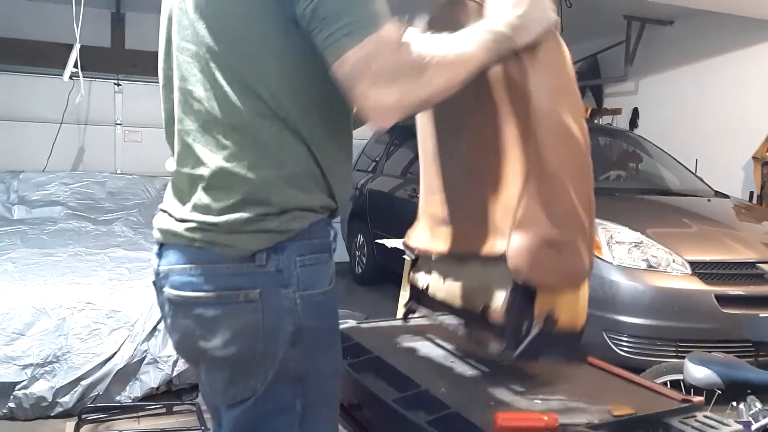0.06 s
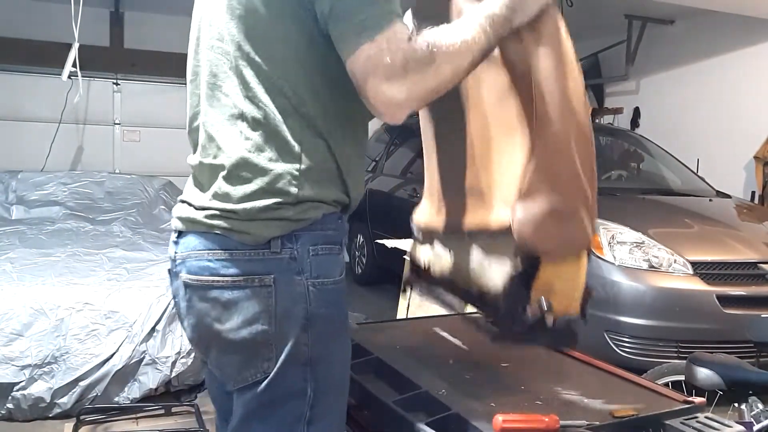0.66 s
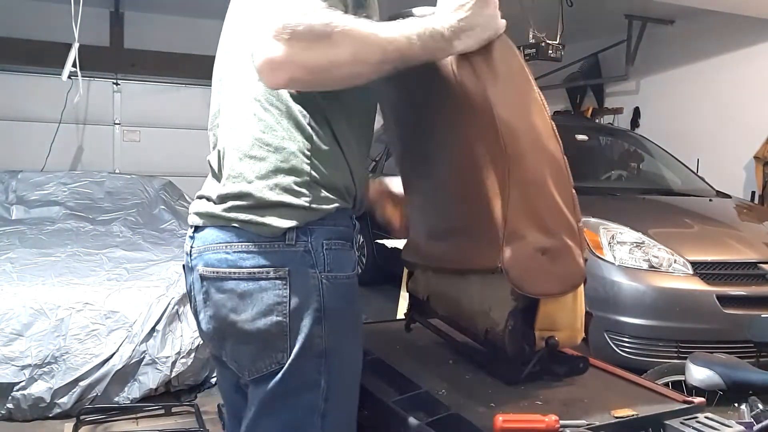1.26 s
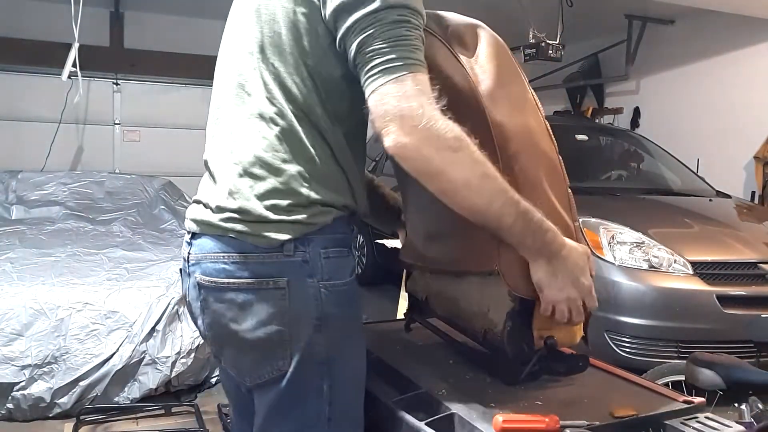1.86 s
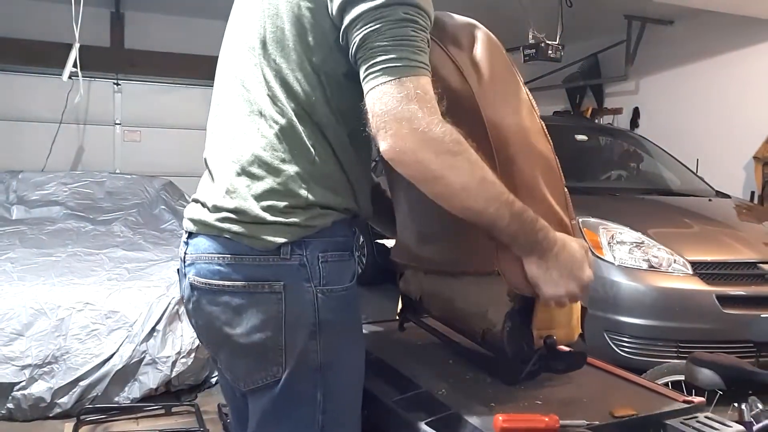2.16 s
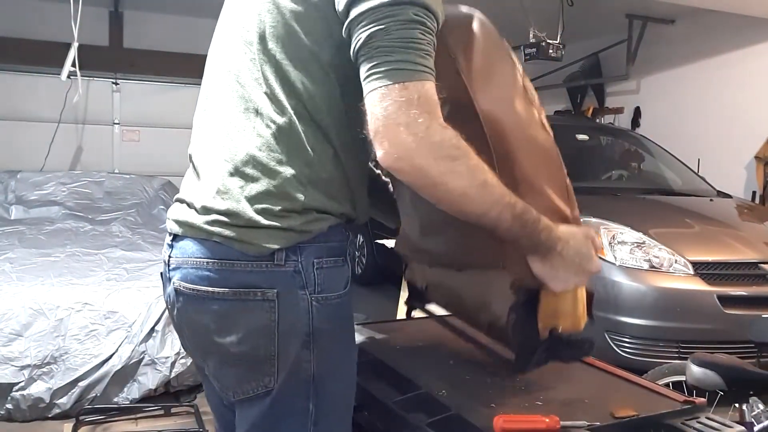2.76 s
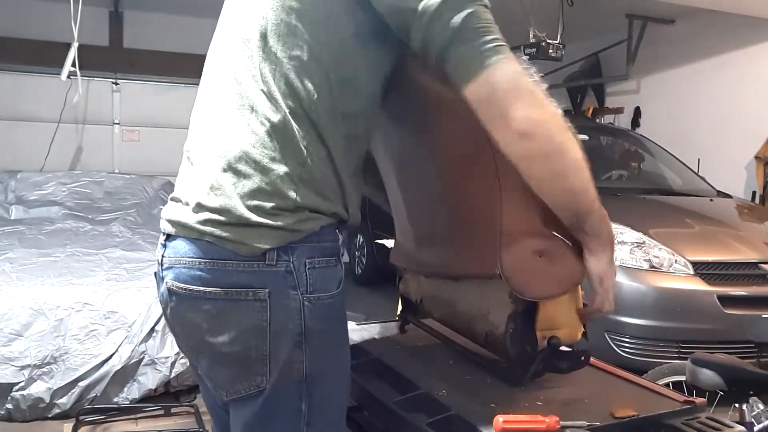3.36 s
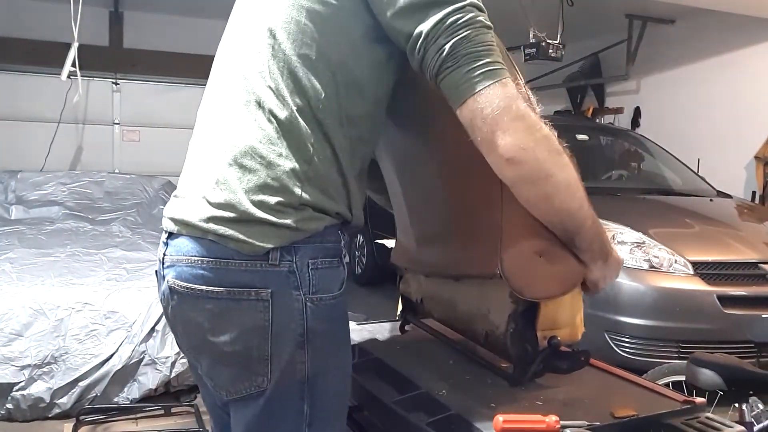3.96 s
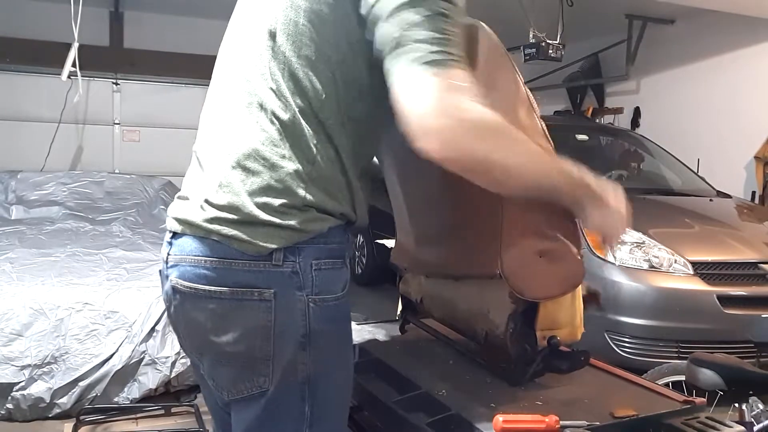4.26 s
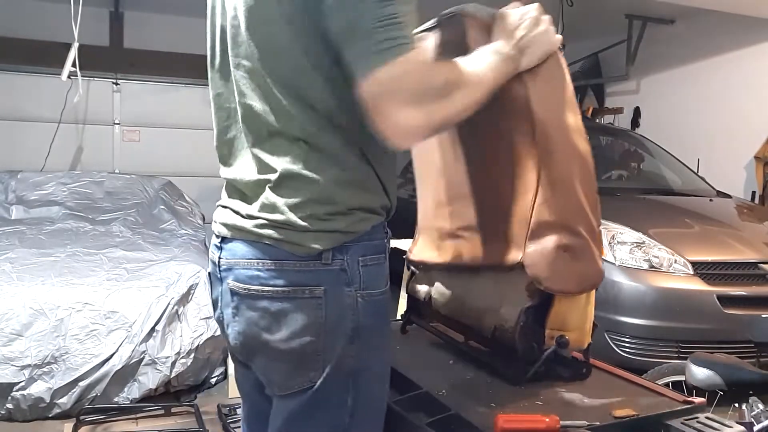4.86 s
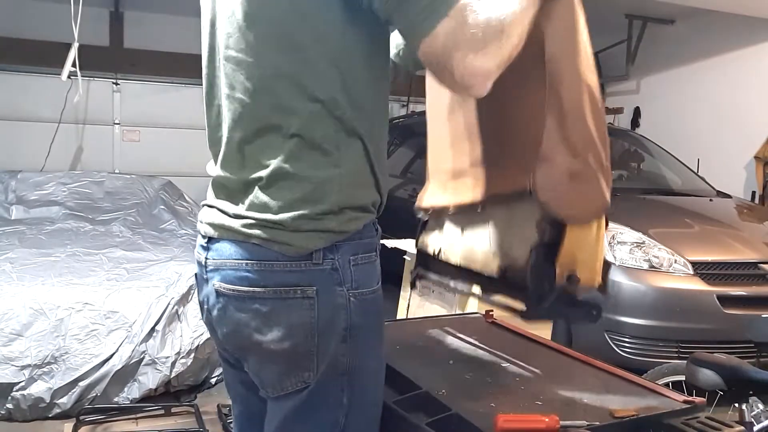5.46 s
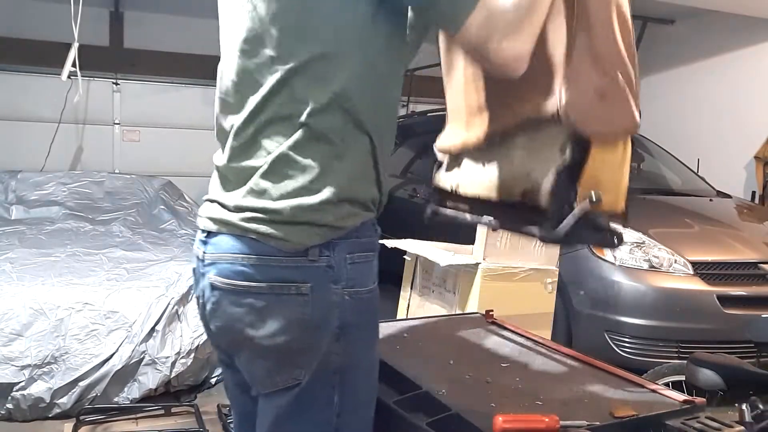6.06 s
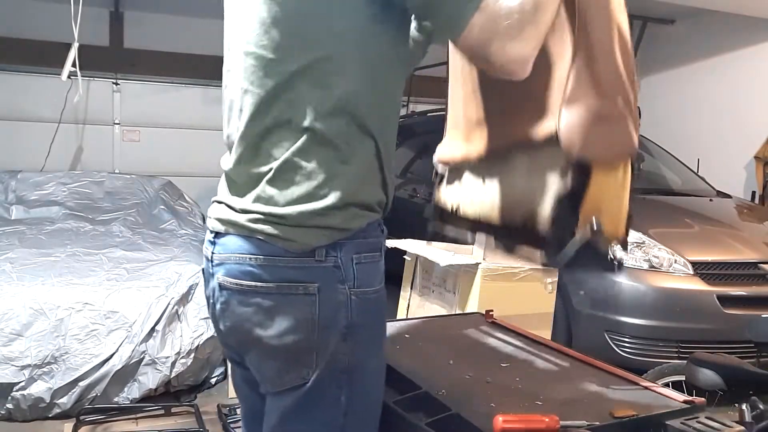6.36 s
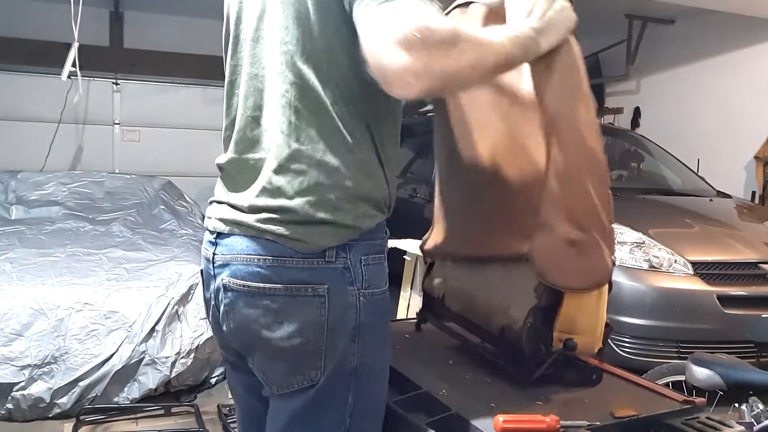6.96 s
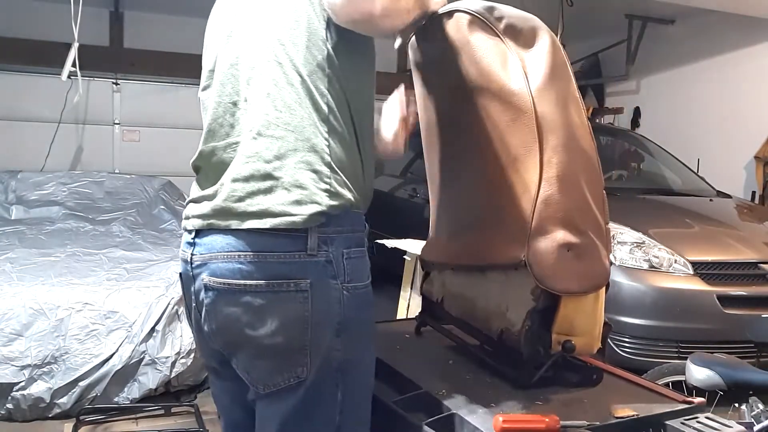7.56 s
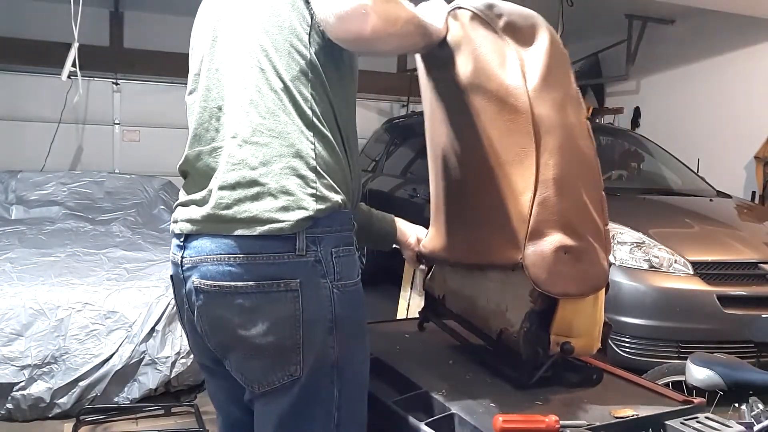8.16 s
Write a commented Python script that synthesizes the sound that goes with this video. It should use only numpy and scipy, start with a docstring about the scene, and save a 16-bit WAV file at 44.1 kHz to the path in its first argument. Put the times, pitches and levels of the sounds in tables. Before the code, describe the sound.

A car seat's steel frame knocks on a garage workbench while its cover is rubbed, tugged with a crackle and shaken so it flaps.

```python
"""A faint fading hiss comes first, then a rub and a bump: a loose cover is tugged over a car seat back.
The seat's steel frame knocks, rings and rocks on a garage workbench, and the bench top booms.
Small fittings click, hands hiss over the cloth, and the tight hem rips free with a crackle.
The feet scrape as the seat is lifted; it is shaken so the slack cover flaps, then set down again.
The garage adds a short echo and a faint hush of air."""
import sys
import numpy as np
from scipy import signal
from scipy.fft import rfft, irfft
from scipy.io import wavfile

SR = 44100
rng = np.random.default_rng(int(sys.argv[2]) if len(sys.argv) > 2 else 0)


def output_pcm(signal):
    """Save a mono or channel-first signal as 16-bit PCM at the path in sys.argv[1].

    Samples are clipped to [-1, 1] before scaling.
    """
    pcm = np.clip(np.atleast_2d(signal).T, -1, 1) * 32767
    wavfile.write(sys.argv[1], SR, np.round(pcm).astype(np.int16))


N = 361619
TIME = np.arange(N) / SR
ONE_SECOND = TIME[:SR]

# The frame hits the bench: (time [s], frame level [dB], thud level [dB], clack level [dB],
# frame brightness [dB])
KNOCKS = [(0.403, -27, -42, -42.5, -3.5), (0.769, -22.5, -46, -36.5, 1), (0.774, -20.5, -26.5, -28.5, -3.5),
          (0.891, -27, -33, -43, -1.5), (0.915, -31.5, -42, -43, -1.5), (0.968, -29.5, -36, -38, -1.5),
          (2.825, -24.5, -28.5, -40.5, -4.5), (4.823, -40.5, -49.5, -61.5, -1.5), (5.076, -57, -73, -53, 4),
          (6.893, -25, -37, -32, 4.5), (7.003, -31.5, -35.5, -42, 2), (8.19, -49, -54, -74.5, -1)]
# Fittings snap: (time [s], level [dB], extra treble [dB])
CLICKS = [(0.806, -26.5, -12.5), (0.916, -39.5, -3), (1.026, -45, 0), (1.982, -52, -22), (2.152, -53, 2.5),
          (2.304, -39, 1.5), (6.922, -30, -5.5), (7.048, -56.5, 15)]
# Single flaps of the slack cover, from a tug or in mid-shake: (time [s], level [dB], starting pitch [Hz])
SINGLE_FLAPS = [(0.086, -56, 250), (2.017, -50.5, 188), (2.307, -35, 171.5), (3.302, -59.5, 177),
                (5.655, -45, 339.4)]
# Turns of the shaking, bottom then top: (time [s], flap level [dB], slide level [dB],
# hem delay [s], hem level [dB])
SHAKES = [(5.354, -40.5, -49, .04, -43), (5.552, -40, -56.5, .034, -44), (5.756, -31.5, -51, .04, -33.5),
          (5.936, -35.5, -56.5, .02, -41), (6.154, -31.5, -48, .04, -55), (6.321, -39.5, -57, .04, -38),
          (6.545, -43, -56, .048, -48.5)]
# The cover slides early and fast at the bottom, late and slow at the top: (delay [s], rise [s], fall [s])
SLIDE_DOWN, SLIDE_UP = (0.012, 0.021, 0.058), (0.071, 0.047, 0.086)
# A faint fading hiss opens the scene; in the later rows the cover is pulled over the foam:
# (loudest time [s], rise [s], fall [s], level [dB])
SWISHES = [(0.03, 0.078, .025, -66), (0.096, 0.013, 0.05, -44), (0.265, 0.021, 0.041, -54.5),
           (0.388, 0.018, 0.018, -51), (0.585, 0.034, 0.039, -55), (0.715, 0.037, 0.04, -55.5),
           (1.0, 0.075, 0.08, -49.5), (1.325, 0.085, 0.076, -59), (1.657, 0.019, 0.13, -61.5),
           (2.1, 0.066, 0.092, -60.5), (2.34, 0.12, 0.065, -58.5), (3.61, 0.018, 0.058, -62.5),
           (4.95, 0.16, 0.073, -59.5), (5.246, 0.047, 0.086, -54.5), (7.5, 0.27, 0.17, -58),
           (8.099, 0.02, 0.054, -56.5)]
# A hand or sleeve brushes by: (time of top speed [s], rise [s], fall [s], level [dB], low edge [Hz])
BRUSHES = [(1.84, .12, 0.19, -58.5, 1500), (3.13, 0.12, 0.067, -74.5, 2000),
           (3.395, .028, 0.064, -58, 4720), (3.945, 0.013, 0.029, -67.5, 3500),
           (4.15, 0.019, 0.038, -62.5, 3790), (4.275, 0.048, 0.058, -56, 2990),
           (4.494, 0.014, 0.083, -55.5, 2180), (4.76, 0.033, 0.3, -66, 1500), (7.27, 0.11, 0.15, -56, 1500),
           (7.85, 0.1, 0.45, -67, 3970)]

# The tones each part rings with: (pitch [Hz], level [dB], time to fade by 60 dB [s])
FRAME_TONES = [(273, 3.5, 0.17), (310.5, 4, 0.15), (361, -4, 0.15), (437, -8.5, .24), (515, -9, .15),
               (623.4, -3, 0.17), (692.6, -10, .22), (785, -15, 0.14), (1288, -18.5, 0.27),
               (1404, -20, 0.19), (2480, -23, .22)]
BENCH_TONES = [(80.4, -4, 0.19), (97, -1, 0.15), (124.1, 4, 0.098), (171, 1.5, 0.11)]
FITTING_TONES = [(4400, -1, .13), (5215, 2, 0.073), (6550, 9, .07)]

# How strong each noise is from bass to treble: (frequency [Hz], level [dB])
FRAME_CLUNK = [(45, -39), (150, -2.5), (230, -7.5), (320, 3), (480, -2.5), (700, -3), (1000, -11),
               (2000, -22.5), (12000, -63)]
STEEL_CLACK = [(200, -24.5), (700, -7), (1500, 5.5), (2500, 2), (3600, -0.5), (5500, -5.5), (6700, -2),
               (7800, -17), (11000, -20), (16000, -26.5)]
FITTING_SNAP = [(400, -22), (2000, -3.5), (4500, -5.5), (6700, 0.5), (7900, -6), (10000, -0.5),
                (16000, -13.5)]
FOAM_THUMP = [(60, -22), (150, 11), (235, -8), (345, 3.5), (500, -13.5), (4000, -43.5)]
CLOTH_HISS = [(100, -25), (600, -6), (2200, -8), (4000, -4), (6600, -2), (7300, -4.5), (7900, -12.5),
              (11000, -10), (16000, -18.5)]
COVER_RASP = [(50, -18.5), (150, 9.5), (220, 6), (800, 4), (1500, 0), (3000, -4.5), (7000, -15),
              (16000, -39)]
HEM_CRACKLE = [(400, -9), (2000, -7.5), (7000, -5.5), (11500, -5.5), (13000, -8), (16000, -12)]
FOOT_SCRAPE = [(60, -42), (110, -3.5), (800, -1.5), (1600, -8.5), (7000, -26), (15000, -58)]
AIR_HUSH = [(15, -46), (25, -25), (69, 0), (122, 5), (188, -9), (389, -15), (1380, -16), (3260, -21),
            (6550, -13), (8350, -22.5), (15500, -23.5)]

# How long the garage echoes: (frequency [Hz], time to fade by 60 dB [s])
ECHO_TIMES = [(70, 0.52), (160, 0.62), (400, 0.64), (3000, 0.8), (7000, 0.54), (15000, 0.35)]
# How alike left and right sound: (frequency [Hz], likeness [1 = the same])
LIKENESS = [(100, 0.94), (250, 0.93), (500, 0.77), (1000, 0.26), (2000, 0.067), (4000, -0.0061)]
# How the two microphones differ: (frequency [Hz], left minus right [dB])
BALANCE = [(300, 0.5), (1200, -0.7), (4000, -1), (9000, 2)]


def knocks(ring_db=-8, clunk_db=-5, thud_db=-3, clack_db=-1, give_s=0.0006, bench_low_hz=66):
    """Each blow rings the frame, clacks steel on the bench and sets the bench top booming."""
    steel, boom = np.zeros((2, 2, N))
    rock = (0.019, -2.5, 5, -7.5, 0)  # the other foot lands just after, duller and heavier
    for knock in np.array(KNOCKS):
        for s, frame_db, bench_db, hard_db, bright_db in knock, knock + rock:
            frame = amp(ring_db) * ring(FRAME_TONES)[:SR // 2]
            frame = frame + amp(clunk_db) * burst(FRAME_CLUNK, fade_s=0.19, crack=9.2)
            add(steel, s, amp(frame_db) * colour(frame, [(310, 0), (450, bright_db)]))
            add(steel, s, amp(hard_db + clack_db) * burst(STEEL_CLACK, fade_s=0.11, crack=9.7))
            thud = ring(BENCH_TONES, detune=0.03) * (1 - np.exp(-ONE_SECOND / give_s))
            add(boom, s, amp(bench_db + thud_db) * thud)
    return steel + cut_lows(boom, bench_low_hz, order=6)  # so small a board gives no deep bass


def clicks(snap_db=-6, ring_db=-15):
    """Loose metal and plastic fittings snap and ring briefly."""
    out = np.zeros((2, N))
    for s, db, treble_db in CLICKS:
        snap = burst(FITTING_SNAP, fade_s=0.07, crack=3)
        add(out, s, amp(db + snap_db) * colour(snap, [(7000, 0.0076), (9000, treble_db)]))
        add(out, s, amp(db + ring_db) * ring(FITTING_TONES))
    return out


def flaps(single_db=3, shake_db=0.5, slap_db=-13, hem_pitch_ratio=0.81):
    """Some flaps come alone; each turn of the shaking flaps the cover and then its loose hem."""
    out = np.zeros((2, N))
    for s, db, taut_hz in SINGLE_FLAPS:
        add(out, s, amp(db + single_db) * flap(taut_hz))
    for s, db, _, hem_s, hem_db in SHAKES:
        taut_hz = 346.5 + 10 * (db + 34)  # a harder shake pulls the cover tighter, so it sounds higher
        add(out, s, amp(db + shake_db) * flap(taut_hz))
        add(out, s + hem_s, amp(hem_db) * flap(taut_hz * hem_pitch_ratio))
    for s, db, *_ in SHAKES[::2]:  # at the bottom of a shake the cover also slaps the frame
        add(out, s, amp(db + slap_db) * burst(FRAME_CLUNK, fade_s=0.084, crack=4.9))
    return out


def flap(taut_hz, slack_hz=108, sag_s=0.014, swell_s=0.0054,
         fold_s=0.01148, fold_db=-5, foam_db=-11, foam_s=0.0098):
    """The cover snaps tight and thumps the foam; its pitch drops as it sags. A looser fold follows."""
    t = ONE_SECOND[:SR // 5]
    thump = level_blow(colour(stereo_noise(len(t)), FOAM_THUMP))
    out = amp(foam_db) * thump * t / foam_s * np.exp(1 - t / foam_s)
    swell = (t / swell_s * np.exp(1 - t / swell_s)) ** 2
    fold_delay = fold_s * (0.5 + rng.random())
    for delay, gain in (0, 1), (fold_delay, amp(fold_db)):
        hz = slack_hz + (taut_hz - slack_hz) * np.exp(-(t + delay / 2) / sag_s)
        add(out, delay, gain * swell * np.sin(2 * np.pi * np.cumsum(hz) / SR))
    return out


def rubbing(hiss_db=-2):
    """Hands brush the cloth with a hiss; dragging it over the foam adds a lower rasp."""
    loudness = sum(stroke(*row) for row in SWISHES + slides())
    hiss = friction(CLOTH_HISS, slips_per_s=2900, uneven_db=0, smooth=0.94, flutter_db=1.5)
    swish = amp(hiss_db) * loudness * hiss
    for *row, edge_hz in BRUSHES:
        swish += stroke(*row) * cut_lows(hiss[:, ::-1], edge_hz, order=3)
    rasp = loudness * friction(COVER_RASP, slips_per_s=620, uneven_db=1, smooth=1.1, flutter_db=1.5)
    return swish + rasp


def slides():
    """Extra rows like SWISHES: the cover slips on the foam after each turn of the shaking."""
    rows = []
    for turn, (s, _, db, *_) in enumerate(SHAKES):
        delay_s, rise_s, fall_s = SLIDE_UP if turn % 2 else SLIDE_DOWN
        rows.append((s + delay_s, rise_s, fall_s, db))
    return rows


def rip(start_s=2.195, db=-41.5, shudder_db=5, build_s=0.029):
    """The tight hem crackles free and the foam begins to shudder."""
    crackle = friction(HEM_CRACKLE, slips_per_s=1200, uneven_db=0, smooth=0.81, flutter_db=1)
    shudder = friction(FOAM_THUMP, slips_per_s=1100, uneven_db=-6, smooth=0.64, flutter_db=1.5)
    build = np.clip((TIME - start_s) / build_s, 0, 1)
    loudness = amp(db) * held(start_s, rise_s=0.0024, fade_after_s=0.049, fade_db_per_s=437.5)
    return loudness * (crackle + amp(shudder_db) * build * shudder)


def scrape(start_s=4.82, db=-51):
    """Steel feet judder across the bench as the seat is lifted."""
    judder = friction(FOOT_SCRAPE, slips_per_s=340, uneven_db=2.5, smooth=0.61, flutter_db=2)
    return amp(db) * held(start_s, rise_s=0.08, fade_after_s=0.208, fade_db_per_s=431) * judder


def garage_echo(x, db=-4, build_s=0.0014, shift_hz=9):
    """Echoes fade at their own speed at each pitch; three patterns take turns so they do not ring."""
    out = np.zeros((2, N))
    for phase in np.linspace(0, np.pi, 3, endpoint=False):
        hz, t, bands = signal.stft(stereo_noise(SR), SR, nperseg=512)
        fading = bands * fade(t, look_up(ECHO_TIMES, hz)[:, None])
        tail = signal.istft(fading, SR, nperseg=512)[1][:, :SR]
        tail = tail * (1 - np.exp(-(ONE_SECOND / build_s) ** 2))
        share = np.cos(np.pi * shift_hz * TIME + phase) * np.sqrt(2 / 3)
        out += signal.fftconvolve(x * share, tail / np.linalg.norm(tail[0]), axes=1)[:, :N]
    return amp(db) * out


def still_air(db=-66.5):
    """The faint, steady hush of the garage."""
    return amp(db) * level(colour(stereo_noise(N), AIR_HUSH))


def ring(tones, detune=0):
    """Fading tones; each blow lands on a new spot, which changes their mix and may shift their pitch."""
    hz, db, fade_s = np.transpose(tones)[:, :, None]
    signs = (-1) ** np.arange(len(hz))[:, None]
    weight = signs * amp(db + 2 * rng.standard_normal(hz.shape))
    hz = hz * (1 + detune * rng.standard_normal(hz.shape))
    waves = weight * fade(ONE_SECOND, fade_s) * np.sin(2 * np.pi * hz * ONE_SECOND)
    return level_blow(waves.sum(0))


def burst(spectrum, fade_s, crack):
    """One sharp contact, then fading noise: too many tones to tell apart."""
    t = ONE_SECOND[:SR // 2]
    rattle = stereo_noise(len(t)) * fade(t, fade_s)
    rattle[:, 0] += crack
    return level_blow(colour(rattle, spectrum))


def friction(spectrum, slips_per_s, uneven_db, smooth, flutter_db, flutter_hz=40):
    """Many tiny slips of uneven size over a smooth hiss; the grip flutters."""
    sizes = amp(uneven_db * np.minimum(rng.exponential(1, N), 5))
    slipping = rng.random(N) < slips_per_s / SR
    slips = level(sizes * slipping * rng.standard_normal((2, N)))
    slowing = 1 + (np.fft.rfftfreq(N, 1 / SR) / flutter_hz) ** 2
    grip = level(irfft(rfft(rng.standard_normal(N)) / slowing, N))
    noise = stereo(slips + smooth * rng.standard_normal((2, N)))
    return level(colour(noise * amp(flutter_db * grip), spectrum))


def stroke(s, rise_s, fall_s, db):
    """Loudness that swells to a peak at s seconds, then eases off."""
    width = np.where(TIME < s, rise_s, fall_s)
    return amp(db) * np.exp(-np.minimum(((TIME - s) / width) ** 2 / 2, 20))


def held(start_s, rise_s, fade_after_s, fade_db_per_s):
    """Loudness that rises, holds, then fades evenly."""
    t = TIME - start_s
    return np.clip(t / rise_s, 0, 1) * amp(-fade_db_per_s * np.maximum(t - fade_after_s, 0))


def fade(t, fade_s):
    """Drops by 60 dB every fade_s seconds."""
    return np.exp(-np.log(1000) * t / fade_s)


def colour(x, spectrum):
    """Shapes bass and treble with a filter that never sounds ahead of a blow (minimum phase)."""
    size = 8192
    log_gain = np.log(amp(look_up(spectrum, abs(np.fft.fftfreq(size, 1 / SR)))))
    taps = np.fft.ifft(np.exp(np.conj(signal.hilbert(log_gain)))).real[:size // 2]
    return signal.oaconvolve(x, taps[None], axes=1)[:, :x.shape[1]]


def cut_lows(x, hz, order):
    """Turns down everything below hz; a higher order cuts more steeply."""
    return signal.sosfilt(signal.butter(order, hz, "highpass", fs=SR, output="sos"), x)


def stereo(noise):
    """Blends two noises as two close microphones hear them: alike in the bass, apart in the treble."""
    left, other = rfft(noise)
    size = noise.shape[1]
    same = np.clip(look_up(LIKENESS, np.fft.rfftfreq(size, 1 / SR)), -1, 1)
    right = same * left + np.sqrt(1 - same ** 2) * other
    return irfft(np.array([left, right]), size)


def stereo_noise(size):
    """Plain hiss for left and right."""
    return stereo(rng.standard_normal((2, size)))


def amp(db):
    """Turns decibels into a multiplier."""
    return 10 ** (np.asarray(db) / 20)


def level(x):
    """Sets the average strength (rms) to 1."""
    return x / np.sqrt(np.mean(x ** 2) + 1e-20)


def level_blow(x):
    """Scales a blow so its first 20 ms have an average strength of 1."""
    return x / np.sqrt(np.mean(x[..., :SR // 50] ** 2))


def look_up(table, hz):
    """Reads between a table's rows, with octaves evenly spaced."""
    row_hz, value = np.transpose(table)
    return np.interp(np.log(hz + 1), np.log(row_hz + 1), value)


def add(mix, s, sound):
    """Adds a sound to both channels, starting at s seconds."""
    part = mix[:, max(round(s * SR), 0):][:, :sound.shape[-1]]
    part += sound[..., :part.shape[-1]]


def scene(soft_echo_db=-4):
    """Hard blows and soft cloth sound in the garage; the cloth gets less echo."""
    hard = knocks() + clicks() + scrape()
    soft = rubbing() + rip() + flaps()
    air = still_air()
    return hard + soft + garage_echo(hard + amp(soft_echo_db) * soft) + air


def record(dry, top_hz=15900):
    """Two slightly unlike microphones pick up the sound, up to top_hz."""
    lean_db = look_up(BALANCE, np.fft.rfftfreq(N, 1 / SR))
    heard = irfft(rfft(dry) * amp(np.array([lean_db, -lean_db]) / 2), N)
    treble_cut = signal.firwin(511, top_hz, window=("kaiser", 9), fs=SR)
    return signal.oaconvolve(heard, treble_cut[None], "same")


dry = scene()
out = record(dry)
output_pcm(out)
```